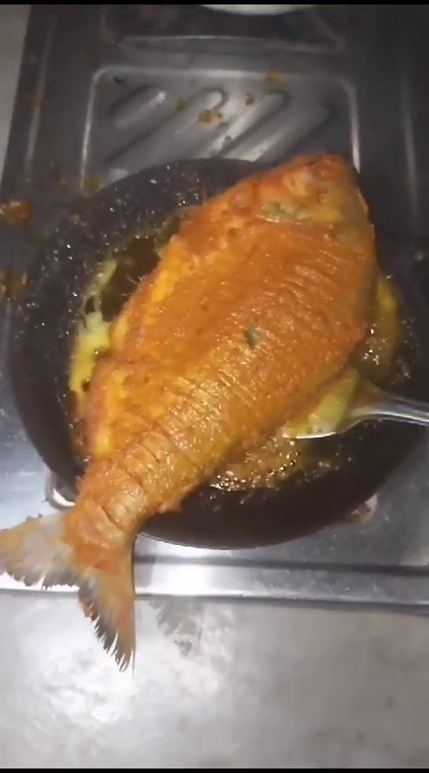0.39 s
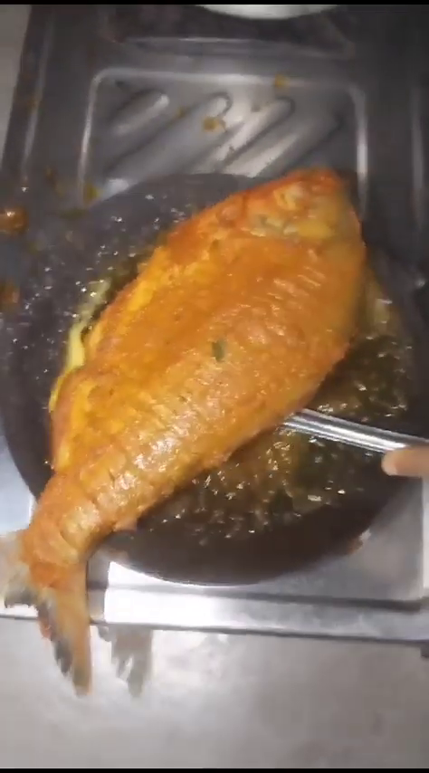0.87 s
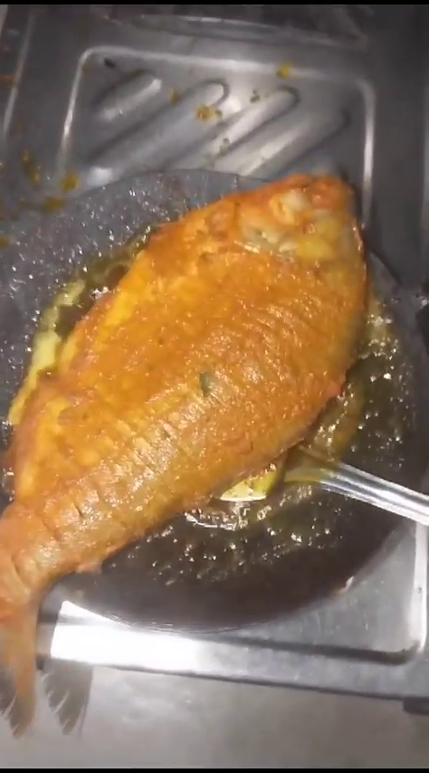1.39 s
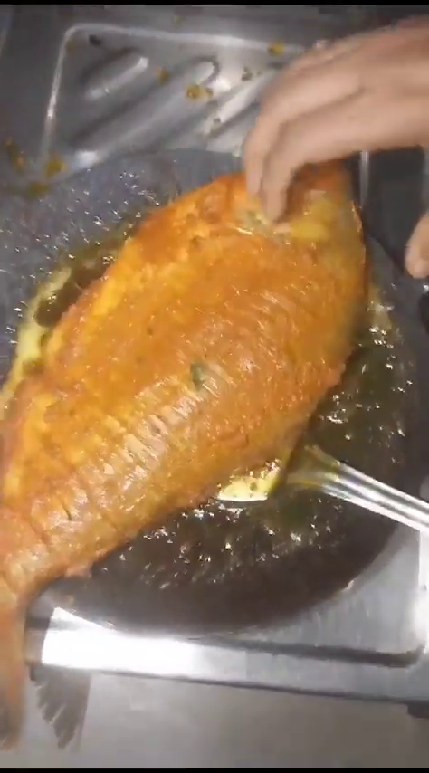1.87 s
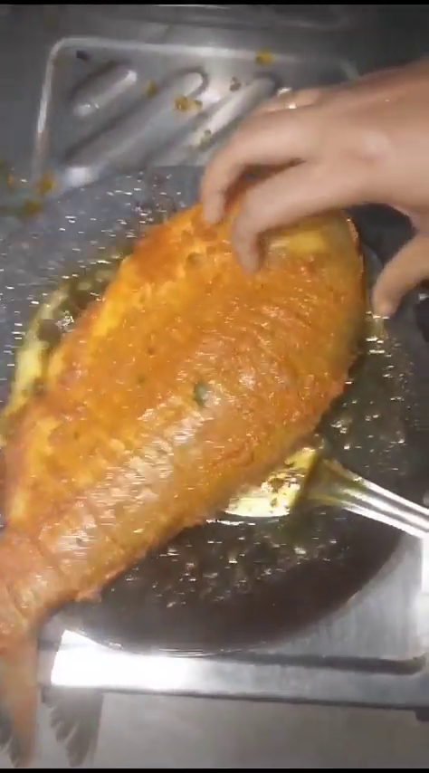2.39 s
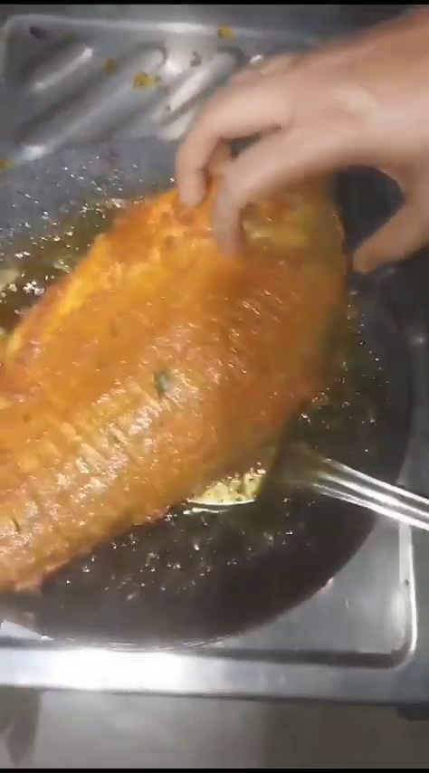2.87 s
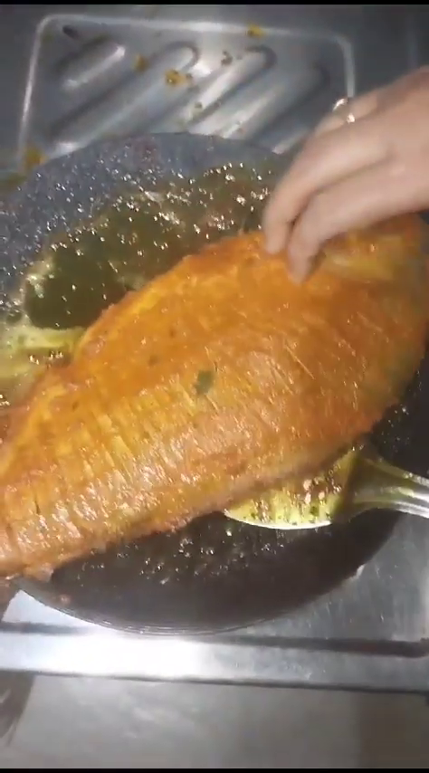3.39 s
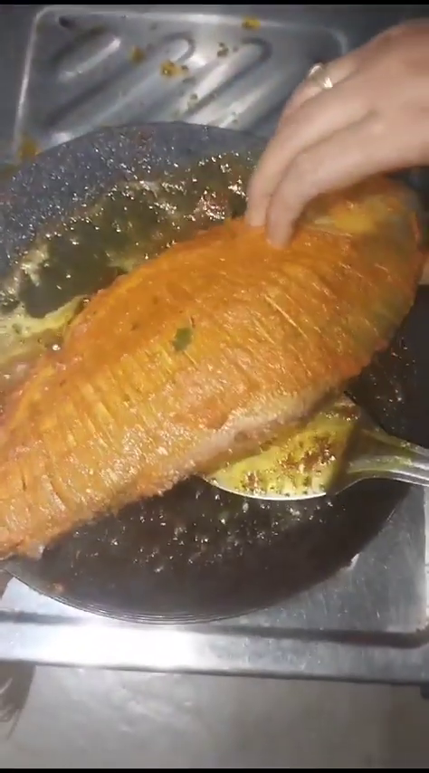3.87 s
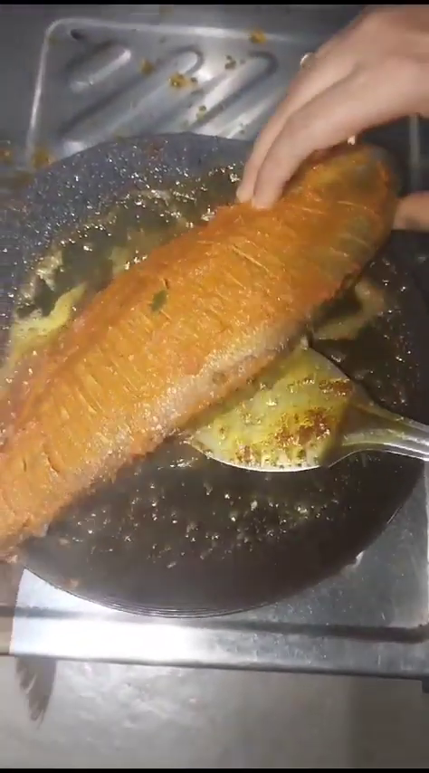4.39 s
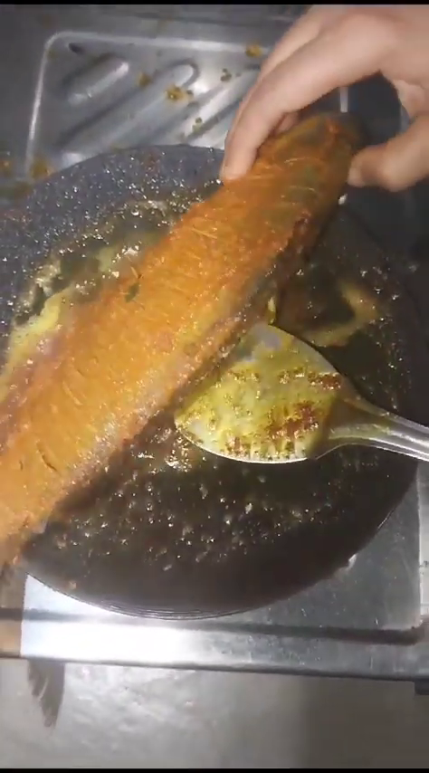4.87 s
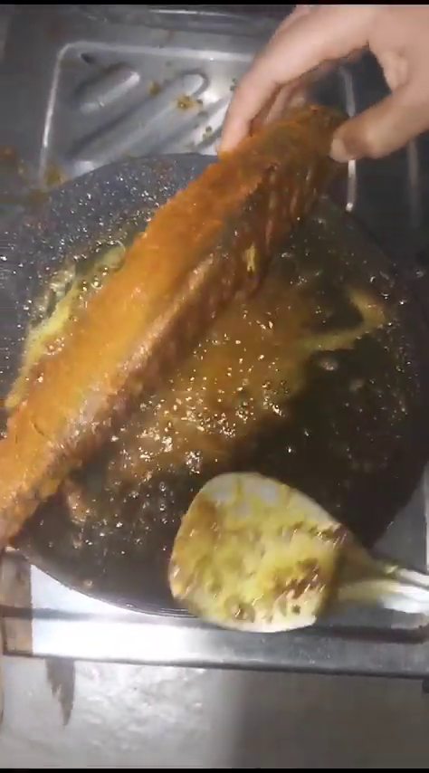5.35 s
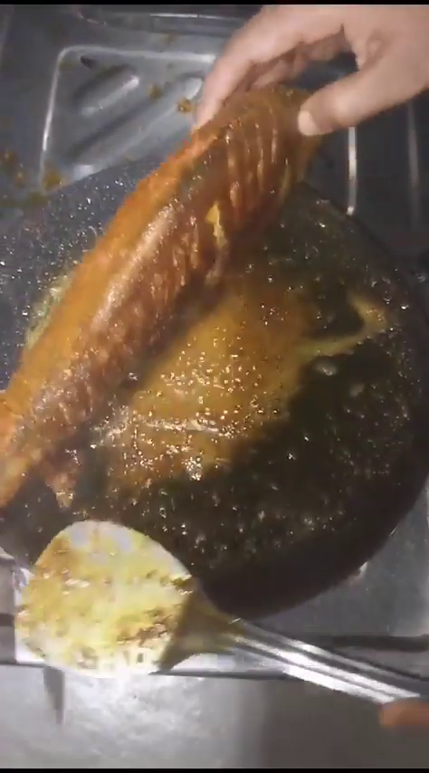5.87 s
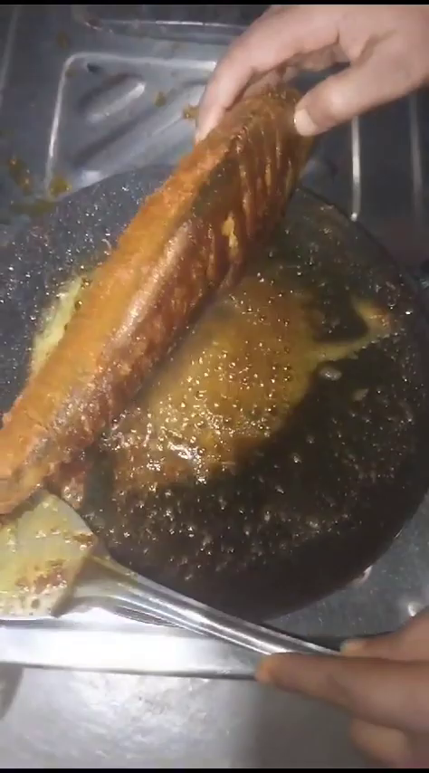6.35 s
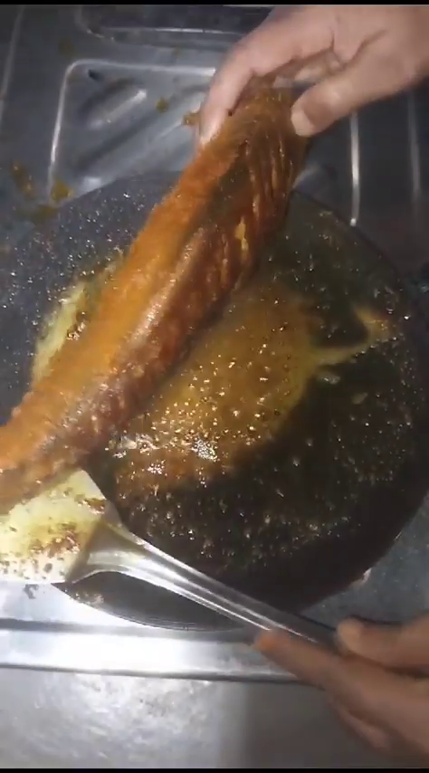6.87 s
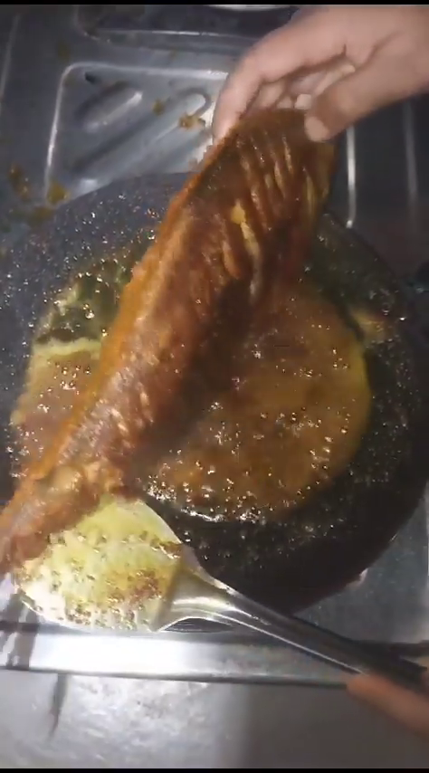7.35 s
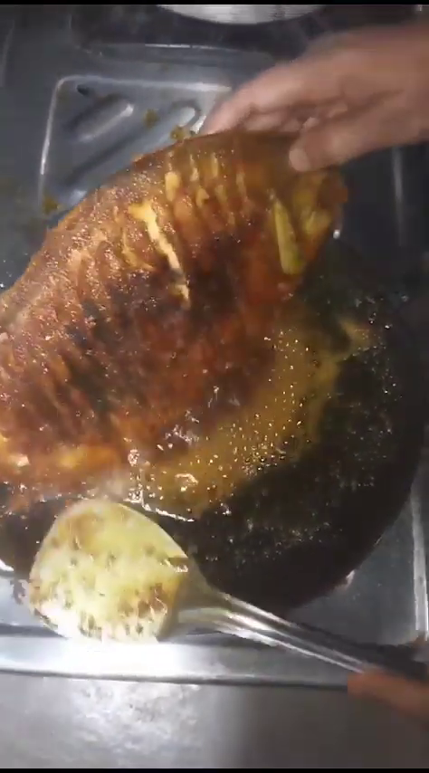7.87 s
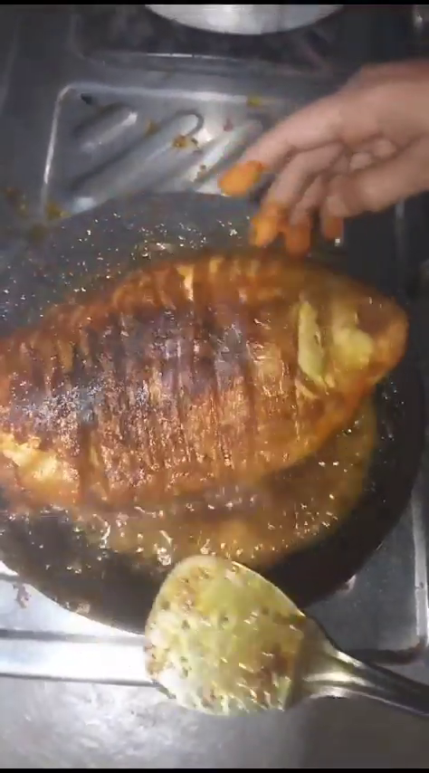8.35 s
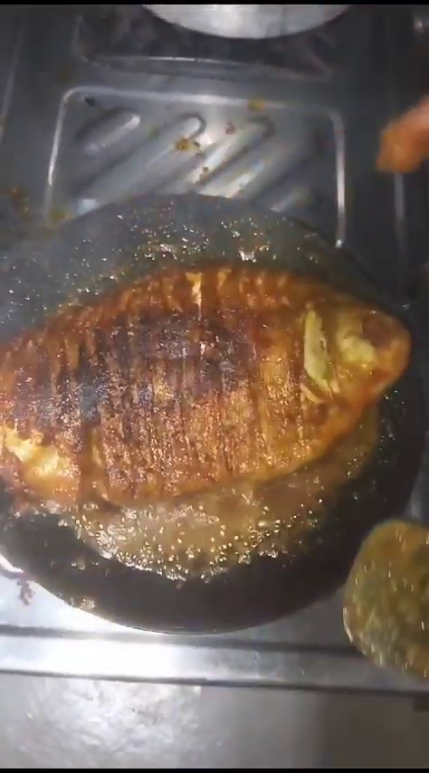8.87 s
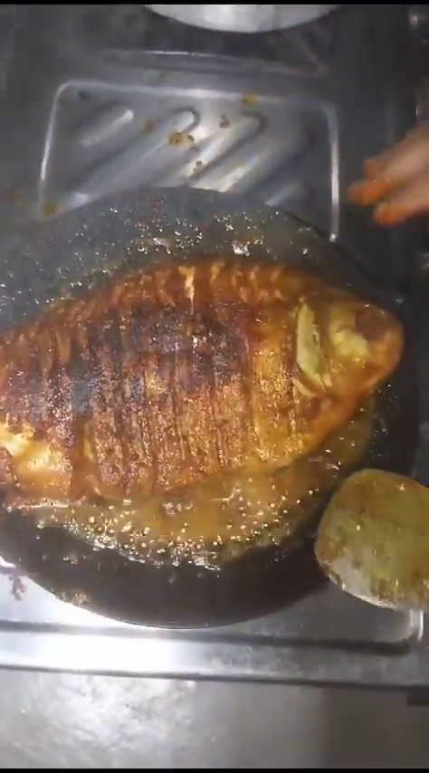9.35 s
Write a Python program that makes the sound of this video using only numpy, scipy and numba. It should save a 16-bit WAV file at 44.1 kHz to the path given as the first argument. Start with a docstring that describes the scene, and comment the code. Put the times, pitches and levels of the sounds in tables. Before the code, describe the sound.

Close up in a small kitchen, a fish fries in shallow oil: a steady bright hiss full of crackles. A spoon rubs and knocks the iron pan dully near the start. The sizzle grows as the fish is raised, stays lively while it is held, then surges as it is laid back and settles. Handheld phone, stereo, left side duller in the treble, faint low murmur behind.

```python
"""In a kitchen, close under a hand-held phone, a whole fish fries in shallow oil in an iron pan.
Steam bubbles of every size burst, as dense hiss and as short swelling sines; their mix shifts as the fish
is raised and laid back. Spray puffs in brief hisses. A steel spoon rubs and knocks the pan: rough noise and
clicks drive its damped modes, which ring dully. A low murmur lies behind.
The two microphone ports of the phone colour the sizzle and pan differently: the left is muffled in the treble."""
import sys
import numpy as np
from scipy import signal
from scipy.fft import rfft, irfft, next_fast_len
from scipy.io import wavfile
from scipy.ndimage import uniform_filter1d, map_coordinates
from numba import njit

SR = 44100
rng = np.random.default_rng(int(sys.argv[2]) if len(sys.argv) > 2 else 0)


def convert_level_to_amplitude(level_db):
    """Map a level in decibels to its linear amplitude factor."""
    exponent = np.asarray(level_db, float) / 20
    return 10 ** exponent


def unload_wav(signal):
    """Save mono or channel-first audio to the path in sys.argv[1] as 16-bit WAV at rate SR, clipped to [-1, 1]."""
    wavfile.write(
        sys.argv[1],
        SR,
        np.round(np.clip(np.atleast_2d(signal).T, -1, 1) * 32767).astype(np.int16),
    )


N = 429534
M = next_fast_len(N + SR // 2)  # padded length for filtering
HZ = np.fft.rfftfreq(M, 1 / SR)


def unit(x):
    """Scale so that the mean of the channels has rms 1."""
    return x / np.sqrt(np.mean(np.atleast_2d(x).mean(0) ** 2) + 1e-20)


def along(points, hz):
    """Read (Hz, value) points on a log frequency axis."""
    point_hz, value = np.transpose(points)
    return np.interp(np.log(hz + 1), np.log(point_hz + 1), value)


def curves(rows):
    """One value per sample for each column after the time."""
    s, *columns = np.transpose(rows)
    return np.array([np.interp(np.arange(N) / SR, s, column) for column in columns])


def wobble(rate):
    """A smooth random curve with rate knots a second."""
    knots = rng.standard_normal(int(N * rate / SR) + 4)
    return map_coordinates(knots, [np.arange(N) * rate / SR])


def filtered(x, response):
    """Multiply the spectrum by a response given on HZ."""
    return irfft(rfft(x, M) * response, M)[..., :N]


def causal(points):
    """Minimum-phase response with the given (Hz, dB) gain, by folding the cepstrum."""
    cepstrum = irfft(np.log(convert_level_to_amplitude(along(points, HZ))), M)
    cepstrum[1:M // 2] *= 2
    cepstrum[M // 2 + 1:] = 0
    return np.exp(rfft(cepstrum))


# The phone's two microphone ports. Each row: frequency in Hz, gain in dB.
LEFT_PORT = [(1000, 2), (1450, 8), (1900, 14), (2400, 11.5), (3100, 16), (4000, 9), (4800, -0.5),
             (5500, 3.3), (6500, -56), (8100, -63), (10500, -36.5), (12000, -6.5), (14500, -20),
             (16000, 9.5)]
RIGHT_PORT = [(1500, -0.5), (2300, 7), (2700, 7.5), (3350, 1.5), (4000, 9.5), (4700, 6.5), (5400, 6),
              (6100, 5), (7000, 10.5), (8500, -2.5), (10000, 7.5), (11800, 11), (14800, 2.5), (16000, -12)]


def port_colours():
    """Responses of the left and right port, each a minimum-phase filter."""
    return np.array([causal(LEFT_PORT), causal(RIGHT_PORT)])


# How alike noise is at the two ports. Each row: frequency in Hz, left-right likeness 0-1.
LIKENESS = [(60, 0.37), (160, 0.57), (450, 1), (800, 1), (1300, 0.38), (3000, 0.67), (5000, 0.24)]


def hiss():
    """Stereo noise whose mid and side shares set the likeness; fully alike in the low middle only."""
    turn = np.arccos(np.clip(along(LIKENESS, HZ), 0, 1)) / 2
    mid_side = np.array([np.cos(turn), np.sin(turn)])
    mid, side = filtered(rng.standard_normal((2, N)), mid_side)
    return np.array([mid + side, mid - side])


@njit
def add_bubbles(out, start, hz, cycles, size, sr):
    """Add bubbles: a sine that swells and dies within a few cycles."""
    for k in range(len(start)):
        first, life = int(start[k] * sr) + 1, cycles[k] / hz[k]
        for i in range(max(first, 0), min(first + int(2 * life * sr), len(out))):
            u = (i / sr - start[k]) / life
            swell = 4 * u * np.exp(1 - 4 * u)
            out[i] += size[k] * swell * np.sin(2 * np.pi * u * cycles[k])


def bubbles(start, hz, cycles, size, lag_s=.00011):
    """Each has its own lag at the left port and its own strength at each port, varying more at the right."""
    out = np.zeros((2, N))
    place = rng.standard_normal((len(start), 2))
    add_bubbles(out[0], start + lag_s * place[:, 0], hz, cycles, size * convert_level_to_amplitude(0.18 * place[:, 1]), SR)
    add_bubbles(out[1], start, hz, cycles, size / convert_level_to_amplitude(1.2 * place[:, 1]), SR)
    return out


# Kitchen murmur of burner and street. Each row: frequency in Hz, relative level in dB.
MURMUR = [(13, -56), (22, -26), (38, -6), (97, -2.5), (215, -3.5), (281, -8.5), (400, -6), (520, -32),
          (880, -120)]


def room():
    """A faint low murmur: shaped noise that wavers a little."""
    level_db = -67.5 + 0.81 * wobble(4.5)
    return convert_level_to_amplitude(level_db) * unit(filtered(hiss(), convert_level_to_amplitude(along(MURMUR, HZ))))


# Spoon and fish dragged over the pan. Each row: start in seconds, length in seconds, upper ring in dB,
# main ring against it in dB, low ring against it in dB.
DRAGS = [(0.327, 0.58, -55.5, -6, -3.5), (1.0, .17, -55.5, -8, -8), (5.615, 0.75, -51.5, -14.5, -22.5),
         (7.922, 0.19, -49.5, -1, -24), (8.32, 0.2, -49.5, -12, -11.5)]
# The pan jolts on its stand and rattles. Each row: start in seconds, rattle in seconds, upper ring in dB,
# main ring against it in dB, low ring against it in dB.
RATTLES = [(1.222, 0.2, -45, -3, -3), (3.888, 0.14, -42, 0, -5)]
# Share of the rattle that is held, 0-1, in the order low, main, upper ring, rumble.
RATTLE_HOLD_SHARE = [0.57, 0.96, 0.4, 0.63]
# The pan rocks to rest: fade in dB per second, in the order low, main, upper ring, rumble.
FADE_DB_PER_S = [81, 110, 73, 100]


def rubbing():
    """Levels in dB of low, main and upper ring and rumble: each drag or jolt swells, holds and fades."""
    swell_db, drag_rise_share, jolt_rise_s = 7, 0.21, .008
    drag_rumble_db, jolt_rumble_db = 1.7, -2  # against the low ring
    t = np.arange(0, N, 32) / SR  # one level for every 32 samples
    fade = np.array(FADE_DB_PER_S)[:, None]
    hold_share = np.array(RATTLE_HOLD_SHARE)[:, None]
    touches = [(s, drag_rise_share * length, length, db, main, low, drag_rumble_db)
               for s, length, db, main, low in DRAGS]
    touches += [(s, jolt_rise_s, rattle * hold_share, db, main, low, jolt_rumble_db)
                for s, rattle, db, main, low in RATTLES]
    levels_db = np.full((len(fade), len(t)), -120.)
    for s, rise_s, hold_s, db, main_db, low_db, rumble_db in touches:
        rise_db = swell_db * np.minimum((t - s) / rise_s - 1, 0)
        held_db = db + np.array([[low_db], [main_db], [0], [low_db + rumble_db]])
        fade_db = fade * np.maximum(t - s - hold_s, 0)
        levels_db = np.maximum(levels_db, held_db + rise_db - fade_db)
    return np.repeat(levels_db, 32, axis=1)[:, :N]


def ringing(modes):
    """Response of damped modes; a steady push of rms 1 comes out at about rms 1."""
    ring = 0
    for k, (hz, db, t60) in enumerate(modes):
        width = np.log(1000) / np.pi / t60  # bandwidth in Hz
        resonance = 1j * HZ * width / (hz * hz - HZ ** 2 + 1j * HZ * width)
        ring = ring + (-1) ** k * convert_level_to_amplitude(db) / np.sqrt(width) * resonance
    return ring / np.sqrt(np.mean(abs(ring) ** 2))


# Knocks on the pan. Each row: time in seconds, level of the dull blow in dB ahead of the ports,
# its pitch in Hz, strength on the pan's ring against the blow in dB.
PAN_KNOCKS = [(1.012, -43, 140, -16), (1.2223, -21.5, 1000, -15.5), (1.26, -35, 300, -2),
              (1.958, -52, 110, -20), (2.799, -46, 100, -15), (3.888, -27, 620, -24)]
# The iron pan's modes. Each row: frequency in Hz, relative level in dB, decay time t60 in seconds.
PAN_MODES = [(238, -5.5, 0.26), (320, -8, 0.093), (367.8, 9, 0.35), (424.5, -0.5, 0.14), (480, -6.5, 0.13),
             (551, -3, 0.07), (604.6, -2, 0.081), (711, -3, 0.11), (827, -1, 0.14), (1000, -7, 0.048),
             (1130, -16, .09), (1178, -9, 0.065)]


def pan(ports):
    """Rough rubbing and knocks drive the same modes; rubbing sets low, main and upper ring apart."""
    tone_share, tone_wander_rad = 0.66, 1  # power share of the steady tone, scale of its phase wander
    *rings_db, rumble_db = rubbing()
    s, db, hz, ring_db = np.transpose(PAN_KNOCKS)
    blows = np.bincount((s * SR).astype(int), convert_level_to_amplitude(db + ring_db) * np.sqrt(SR / 100), N)
    out = bubbles(s, hz, np.full(len(s), 1.8), convert_level_to_amplitude(db))  # the dull blow itself

    # part of the main ring is a steady tone with wandering phase, for drags and rattles alike
    phase = 2 * np.pi * PAN_MODES[2][0] * np.arange(N) / SR + tone_wander_rad * wobble(14)
    tone_level = np.sqrt(2 * tone_share) * convert_level_to_amplitude(rings_db[1] + 1.2 * wobble(25))
    out += tone_level * np.sin(phase)
    rings_db[1] = rings_db[1] + 10 * np.log10(1 - tone_share)

    for level_db, modes in zip(rings_db, (PAN_MODES[:2], PAN_MODES[2:3], PAN_MODES[3:])):
        grit = convert_level_to_amplitude(level_db + 1.9 * wobble(40)) * unit(hiss())
        out += filtered(grit + blows, ringing(modes))
    dull = convert_level_to_amplitude(along([(40, -29), (90, 4.0), (250, 2.0), (600, -1), (1500, -83)], HZ))
    rumble = convert_level_to_amplitude(rumble_db) * unit(filtered(hiss(), dull))  # not coloured by the ports
    return filtered(out, ports) + rumble


# Short puffs of fine spray. Each row: time of the peak in seconds, level in dB.
SPRAY_PUFFS = [(1.761, -40), (1.894, -39), (2.18, -32), (2.372, -33), (2.493, -37), (2.614, -31),
               (2.71, -34), (2.835, -30), (2.898, -30.5), (3.003, -30), (3.224, -34), (3.349, -26),
               (3.559, -30), (3.737, -30), (4.028, -45), (4.1, -32), (4.247, -36), (4.828, -29),
               (5.071, -40), (6.693, -30), (6.765, -31), (7.25, -31), (8.176, -32)]


def puffs(ports):
    """Steam escapes from under the fish in brief hisses of spray: treble noise under bell-shaped swells."""
    puff_ms = 27  # from the peak to 1/e^2
    spray = convert_level_to_amplitude(along([(4000, -30), (7000, -2.5), (10000, -4)], HZ))
    fine = unit(filtered(hiss(), ports * spray))
    t = np.arange(N) / SR
    swell = np.zeros(N)
    for s, db in SPRAY_PUFFS:
        near = slice(max(round((s - .1) * SR), 0), round((s + .1) * SR))
        swell[near] += convert_level_to_amplitude(db) * np.exp(-2 * ((t[near] - s) * 1000 / puff_ms) ** 2)
    return swell * fine


# The loudest single bursts. Each row: time of the peak in seconds, level in dB ahead of the oil's gain,
# pitch in Hz.
LOUD_BURSTS = [(0.1738, -24, 10710), (0.2204, -19, 3170), (0.4318, -19, 3300), (0.784, -20, 3270),
               (1.02, -17, 3060), (1.0786, -17, 2770), (1.1146, -16, 2950), (1.1397, -13, 2500),
               (1.5385, -21, 6700), (1.6357, -22, 2070), (1.6535, -23, 6600), (1.6708, -22, 6370),
               (1.7753, -18, 2900), (1.8137, -23, 6200), (1.848, -23, 6290), (1.8931, -21, 11160),
               (2.0611, -21, 11100), (2.0989, -18, 3000), (2.1988, -17, 3140), (2.2301, -19, 12210),
               (2.4588, -16, 2830), (2.4998, -19, 11380), (2.5923, -17, 11800), (2.6388, -15, 3600),
               (2.7032, -17, 11590), (2.7237, -17, 11150), (2.9462, -15, 3020), (3.0007, -15, 11180),
               (3.1523, -15, 7050), (3.2548, -15, 11240), (3.3838, -11, 2960), (3.5099, -13, 4200),
               (3.6065, -15, 2300), (3.61, -19, 1150), (3.736, -13, 11450), (3.7439, -13, 3250),
               (3.7615, -11, 2690), (3.8558, -11, 2980), (3.9205, -13, 3800), (4.0058, -14, 2890),
               (4.027, -15, 11690), (4.047, -13, 1990), (4.1807, -12.5, 2580), (4.2118, -13, 2960),
               (4.2557, -12, 2930), (4.3113, -14, 2380), (4.4756, -10, 2990), (4.509, -12, 1870),
               (4.5125, -12, 2200), (4.5719, -14, 2410), (4.5877, -9, 11990), (4.666, -12, 2600),
               (4.7638, -9, 2740), (4.9292, -12, 2990), (5.2172, -12, 2900), (5.3048, -14, 12060),
               (5.3755, -17, 1900), (5.4334, -11, 3180), (5.6421, -12, 3120), (5.7859, -14, 3310),
               (7.0344, -14, 2740), (7.2704, -12, 3170), (7.6171, -18, 11780), (7.643, -21, 1250),
               (7.645, -15, 1850), (7.6465, -19, 740), (7.9293, -14, 3990), (7.9311, -13, 3000),
               (7.936, -16, 2000), (7.942, -16, 3300), (7.949, -17, 3800), (9.3068, -15, 3040),
               (9.3408, -15, 2920), (9.3613, -13, 2880)]
# Small bubbles give little bass; the sizzle uses this too. Each row: frequency in Hz, gain in dB.
OIL_GAIN = [(60, -28), (200, -23), (400, -10.5), (700, 0.5), (1200, 3.5)]


def pops(ports):
    """The loudest single bursts, levelled by the mean gain of the two ports; higher ones ring more cycles."""
    s, db, hz = np.transpose(LOUD_BURSTS)
    cycles = 1.62 + 0.22 * hz / 1000
    port_gain = (convert_level_to_amplitude(along(LEFT_PORT, hz)) + convert_level_to_amplitude(along(RIGHT_PORT, hz))) / 2
    start = s - cycles / hz / 4 - .0002  # the swell peaks after a quarter of the life
    bursts = bubbles(start, hz, cycles, convert_level_to_amplitude(db) / port_gain, lag_s=.00004)
    return filtered(bursts, ports * causal(OIL_GAIN))


# Boiling. Each row: time in seconds, strength in dB, lean towards fine spray in dB.
BOILING = [(0, -34.5, 3), (0.6, -35.5, 2.5), (1.08, -31.5, -1), (1.4, -34, 2), (2.1, -34, 5),
           (2.25, -32, -1), (2.9, -31, 3), (3.36, -27, -1.5), (4.3, -25.5, -3.5), (4.7, -27, -0.4),
           (5.2, -27, 1), (5.56, -30, 0), (6.15, -27, -0.5), (6.45, -29.5, 0), (6.9, -30, -3.5),
           (7.3, -29, 2), (7.56, -28.5, -0.5), (7.7, -24.5, -2), (7.85, -24.5, -1.5), (7.89, -26.5, -1),
           (8.05, -28.5, 3.5), (8.15, -28.5, 3.5), (8.25, -26, 2.5), (8.4, -24.5, -0.5), (8.49, -22.5, 1),
           (8.55, -25.5, 0.5), (9.17, -29.5, -1), (9.74, -30.5, 0.5)]
# The fish lies over the oil, is raised, then laid back. Each row: time in seconds, cover 0-1.
FISH_COVER = [(0, 0.87), (1, 0.5), (1.6, 0.9), (2.5, 0.75), (3, 0.83), (3.4, 0.5), (4.2, 0.88), (4.6, 0.3),
              (5, 0.33), (5.4, 0.1), (6, 0.12), (7.4, 0), (7.7, 0.64), (7.87, 1), (7.95, 0), (8.15, 0),
              (8.6, 0.95), (9.1, 0.76), (9.74, 0.97)]
# How each bubble size follows. Each row: relative level in dB, dB gained per dB of boiling,
# dB gained under full cover, dB gained per dB of lean.
SIZE_MIX = [(-11, 0.55, 0.26, -.4), (-1, 0.65, -4, -.3), (-3.5, 0.33, 7, -.3), (-3, 0.66, -2.5, 0.06),
            (-2, 0.29, 1, 0.2), (-1.5, 0.74, 1.2, .9)]
# Juice runs off the tipped fish and small bubbles flare up. Each row: time of the peak in seconds,
# length from it to 1/e in seconds, gain in dB before the sizes share out the strength.
JUICE_FLARES = [(3.1, .25, 3), (6.6, .5, 1.5), (7.78, 0.11, 4.5)]
# Share of a flare that each bubble size takes, 0-1, from the largest bubbles to the smallest.
FLARE_SHARE = [0, 0, 0, 0.71, 1, 0.088]


def boiling():
    """Share the strength of boiling among the bubble sizes, in dB; each size also wanders on its own."""
    strength_db, lean_db = curves(BOILING)
    cover, = curves(FISH_COVER)
    surge_db = strength_db - strength_db.mean()
    mix_db = np.array([db + grows * surge_db + covered_db * cover + leans * lean_db
                       for db, grows, covered_db, leans in SIZE_MIX])
    t = np.arange(N) / SR
    flare_db = sum(db * np.exp(-((t - s) / length) ** 2) for s, length, db in JUICE_FLARES)
    mix_db = mix_db + np.outer(FLARE_SHARE, flare_db)
    total_db = 10 * np.log10(np.sum(convert_level_to_amplitude(mix_db) ** 2, axis=0))
    drift_db = 0.64 * np.array([wobble(9) for _ in SIZE_MIX])
    return strength_db + mix_db - total_db + drift_db


def patchy(x, depth_db):
    """The hiss is uneven: brief random patches of pitch swell and sink."""
    spectrum = signal.stft(x, nperseg=512)[2]
    field = rng.standard_normal(spectrum.shape[1:])
    field = uniform_filter1d(field, size=3, axis=0)  # over pitch
    field = uniform_filter1d(field, size=6, axis=1)  # over time
    gain = convert_level_to_amplitude(depth_db * field / field.std())
    return signal.istft(spectrum * gain, nperseg=512)[1][:, :N]


# Bubble sizes, large to small. Each row: lowest Hz, highest Hz, power share of single bursts 0-1,
# size scatter in dB, shortest life in cycles, scale of its own flicker in dB.
BUBBLE_SIZES = [(60, 1200, 0.26, 4.5, 0.93, 0.4), (1390, 2275, 0.34, 4.5, 1.15, 1.1),
                (2415, 3450, 0.38, 6, 1.25, 0), (3610, 4630, 0.26, 4.5, 2, 0.6),
                (4780, 8770, 0.19, 4.5, 3.7, 0.36), (9320, 17900, 0.33, 2, 3.9, 0.5)]


def sizzle(ports):
    """Each bubble size is a dense hiss with single bursts on top; one surge is common to all sizes."""
    levels_db = boiling()
    surge_db = 0.24 * wobble(7) + 0.34 * wobble(35) + 0.5 * wobble(120)
    out = np.zeros((2, N))
    for level_db, (lo_hz, hi_hz, share, scatter_db, cycles, flicker_db) in zip(levels_db, BUBBLE_SIZES):
        when, pitch, strength, length = rng.random((4, 12000))
        lowest_hz = max(lo_hz, 500)  # single bursts stay above this
        hz = lowest_hz * (hi_hz / lowest_hz) ** pitch
        size = hz * convert_level_to_amplitude(-scatter_db * np.log(strength + 0.011))  # many faint, few strong
        longer = 7 ** length ** 2  # most snap shut, a few ring on
        single = bubbles(when * N / SR, hz, cycles * longer, size / longer ** 0.59)

        edges = np.sqrt((1 + (lo_hz / (HZ + 1)) ** 8) * (1 + (HZ / hi_hz) ** 8))
        band = convert_level_to_amplitude(along(OIL_GAIN, HZ)) / edges
        dense = unit(filtered(hiss(), band * ports))
        single = unit(filtered(single, band * ports))
        flicker = flicker_db * (wobble(16) + wobble(45)) / 2
        blend = np.sqrt(1 - share) * dense + np.sqrt(share) * single
        out += convert_level_to_amplitude(level_db + surge_db + flicker) * blend
    return patchy(out, depth_db=1.41)


# The phone tilts over the pan. Each row: time in seconds, extra lag of the left port in ms,
# lean to the left port in dB.
PHONE_TILT = [(0, -0.061, 0), (1.5, -0.049, -0.4), (2.7, -0.045, -2), (4.2, 0.016, -1.5), (4.7, -0.065, -1),
              (6, -0.083, -2.5), (7.2, -0.078, -3), (7.7, -0.023, -1.7), (9.74, -0.16, -2)]


def scene():
    """Sum the layers at the two ports; the tilt shifts the left port's lag and the balance."""
    ports = port_colours()
    left, right = room() + pan(ports) + puffs(ports) + pops(ports) + sizzle(ports)
    lag_ms, lean_db = curves(PHONE_TILT)
    left = map_coordinates(left, [np.arange(N) - lag_ms / 1000 * SR], order=3, mode="nearest")
    return np.array([left, right]) * convert_level_to_amplitude([lean_db / 2, -lean_db / 2])


def low_pass(x):
    """Removes everything above the highest recorded frequency."""
    return signal.sosfilt(signal.butter(12, 15950, fs=SR, output="sos"), x)


def record(dry):
    """The phone stores the finished mix."""
    return low_pass(dry)


dry = scene()
out = record(dry)
unload_wav(out)
```